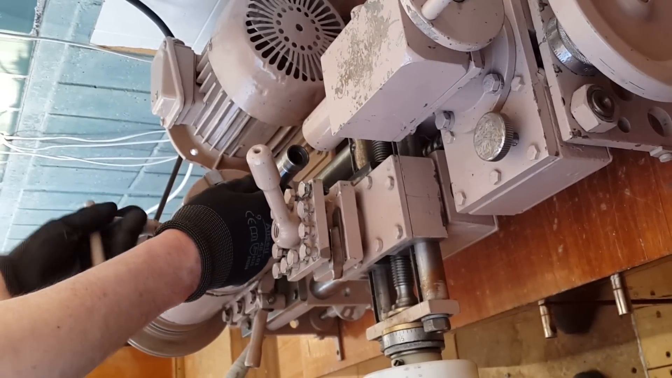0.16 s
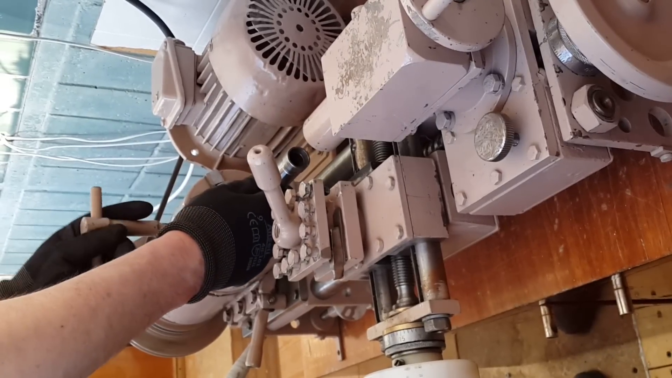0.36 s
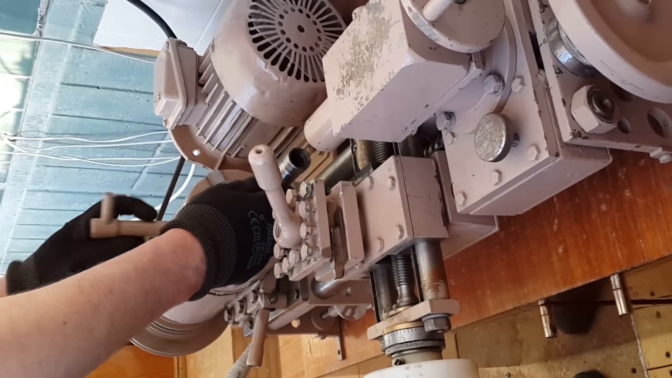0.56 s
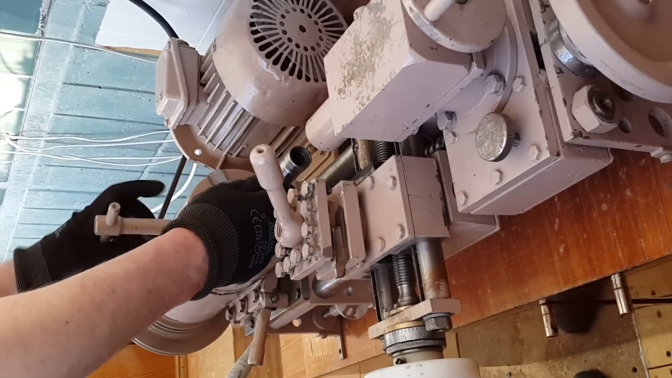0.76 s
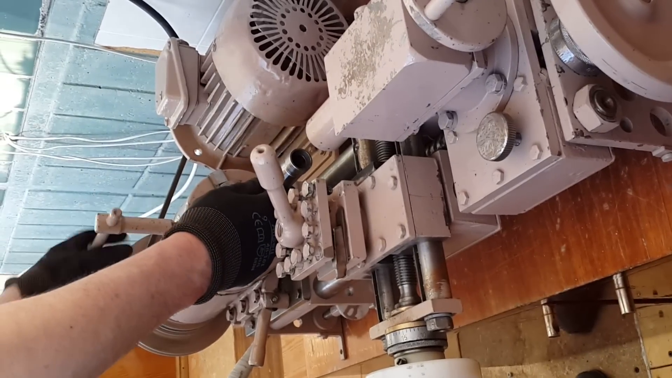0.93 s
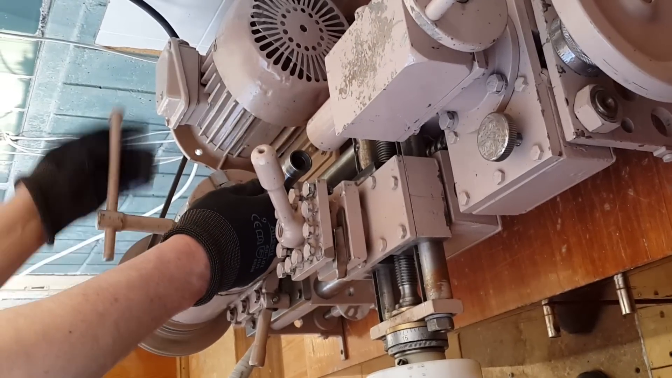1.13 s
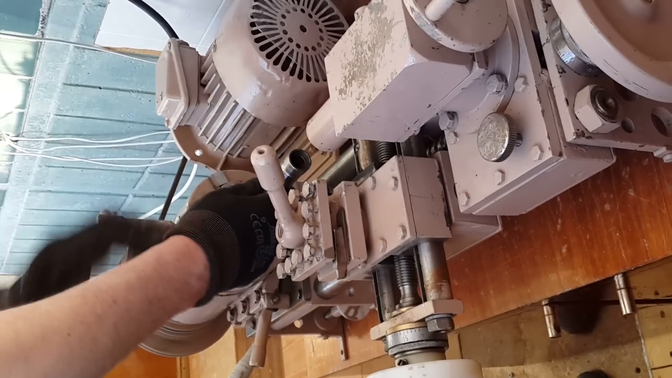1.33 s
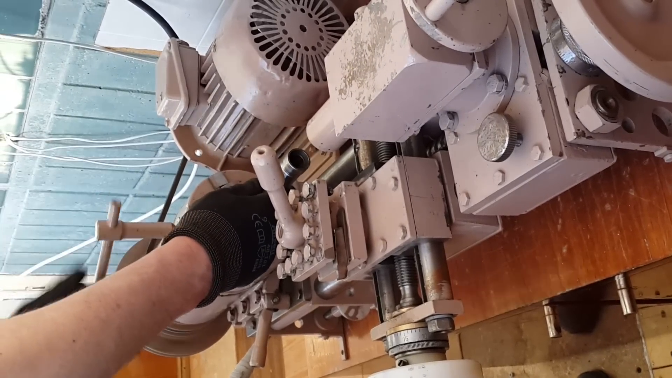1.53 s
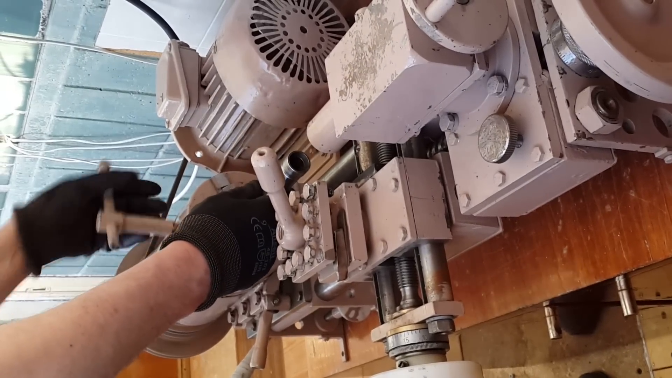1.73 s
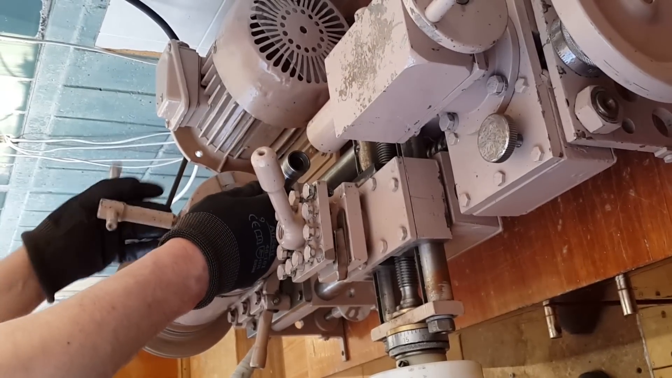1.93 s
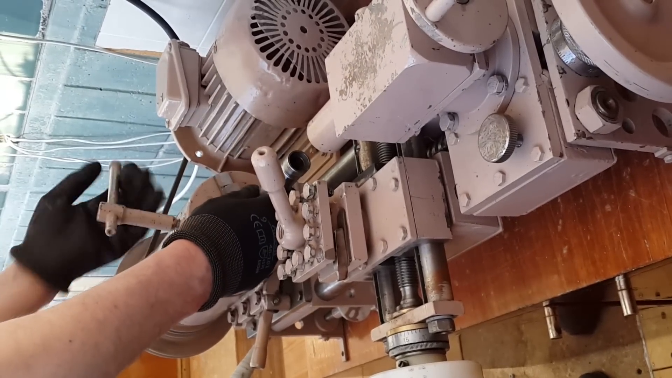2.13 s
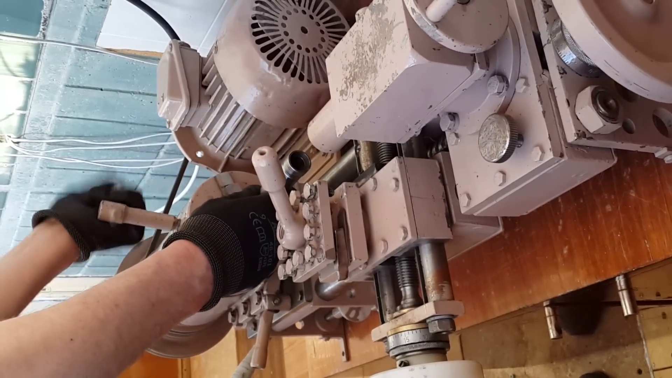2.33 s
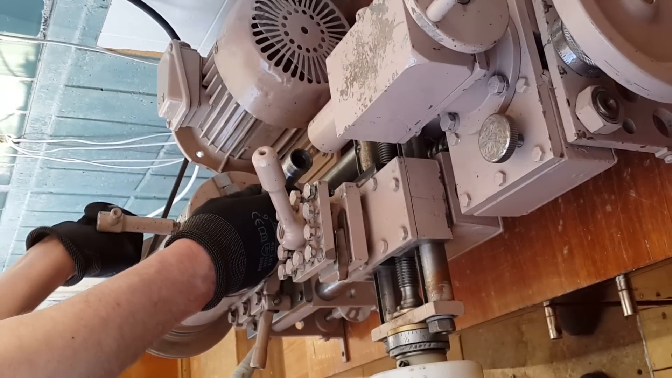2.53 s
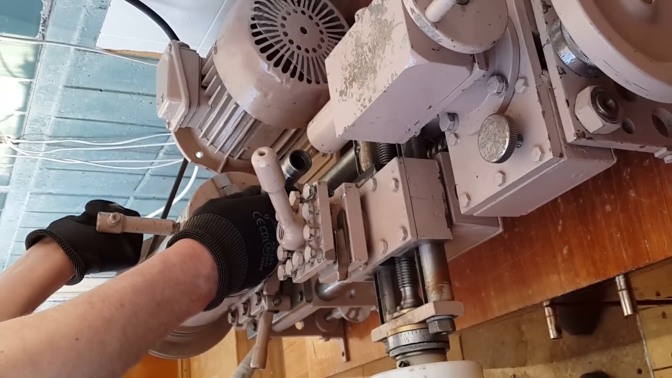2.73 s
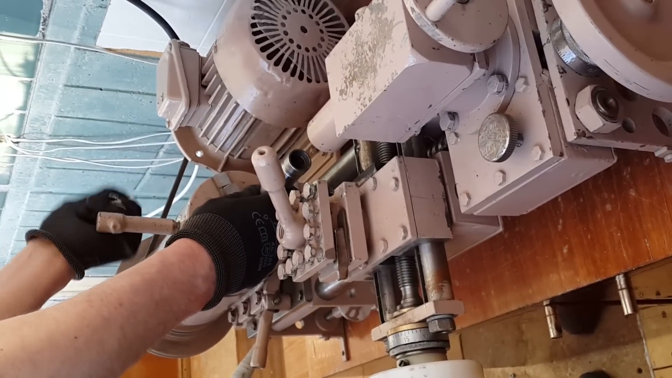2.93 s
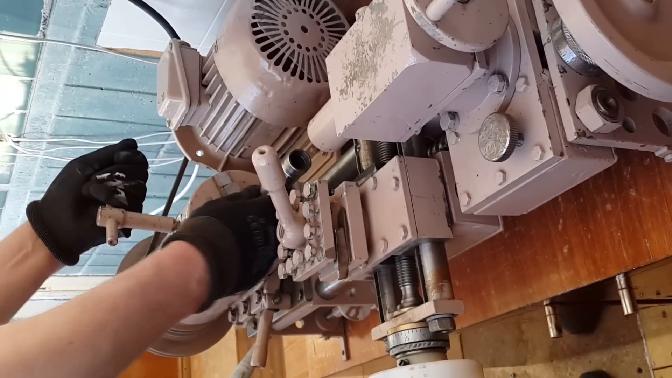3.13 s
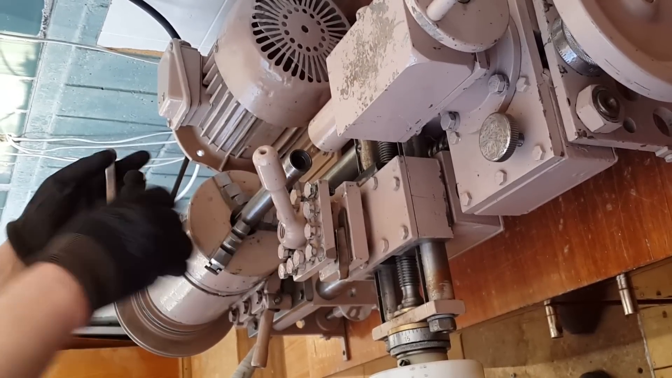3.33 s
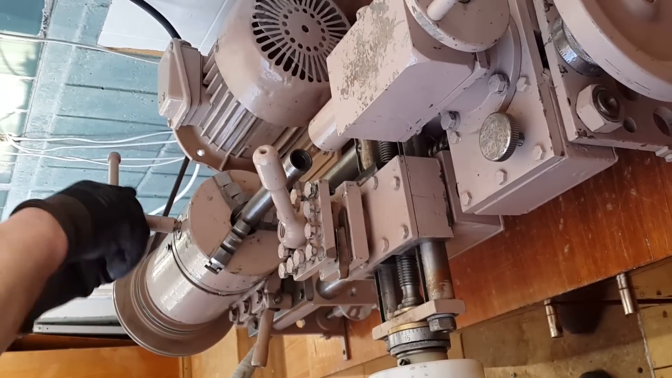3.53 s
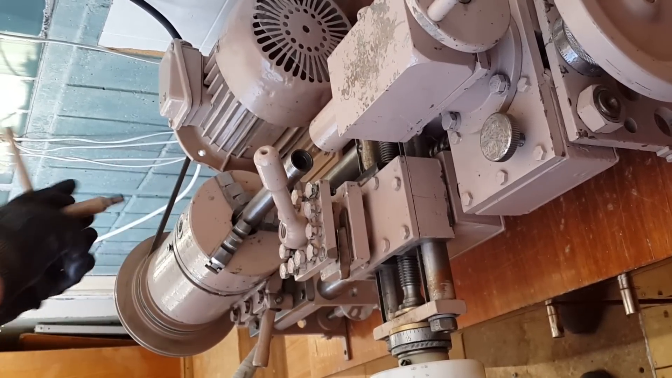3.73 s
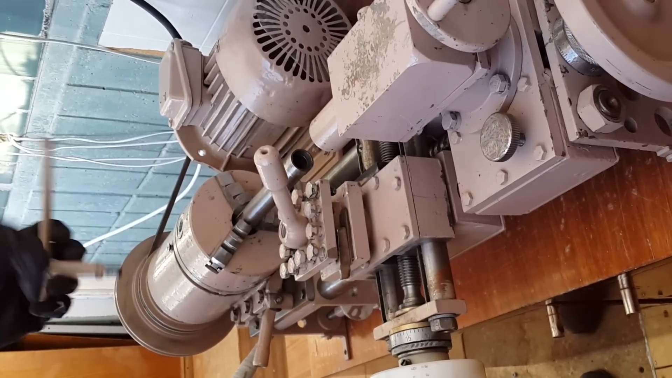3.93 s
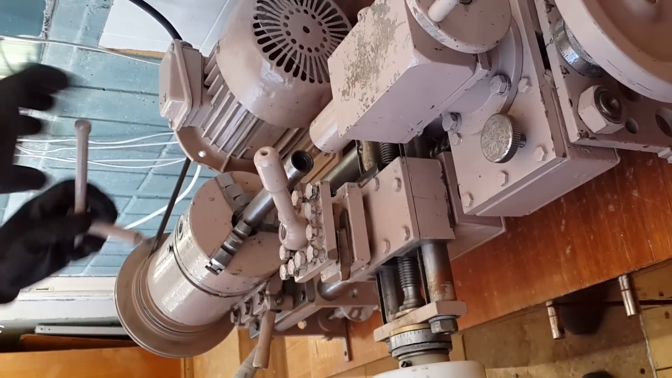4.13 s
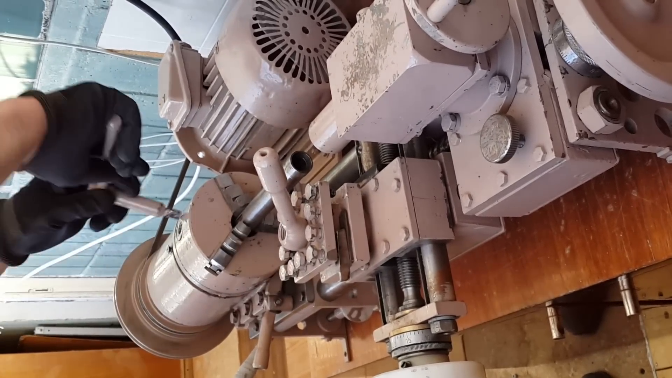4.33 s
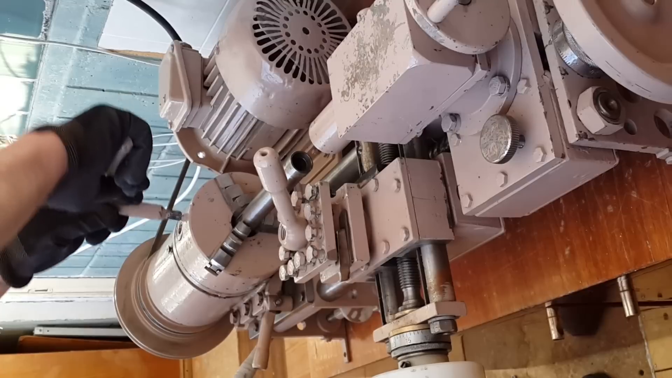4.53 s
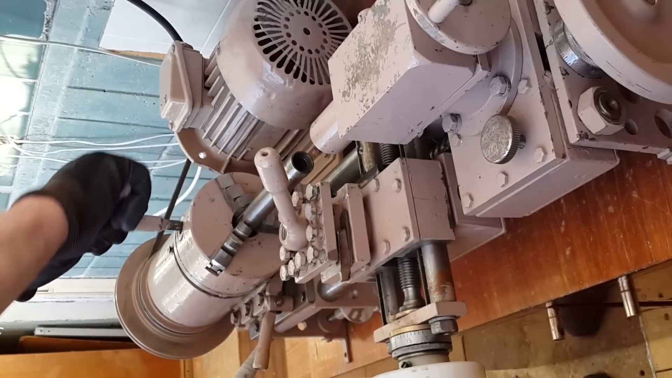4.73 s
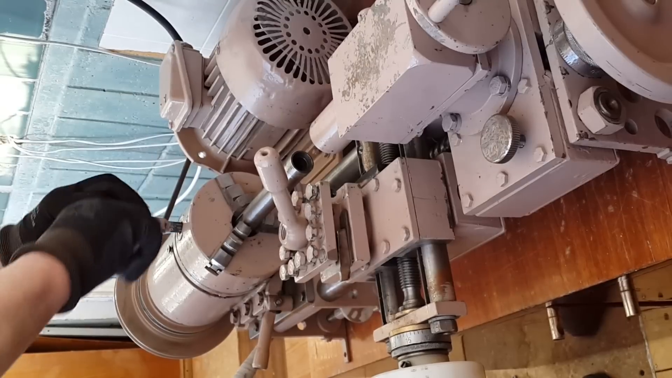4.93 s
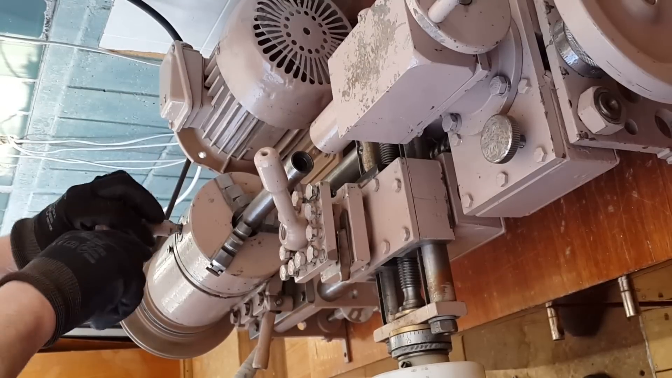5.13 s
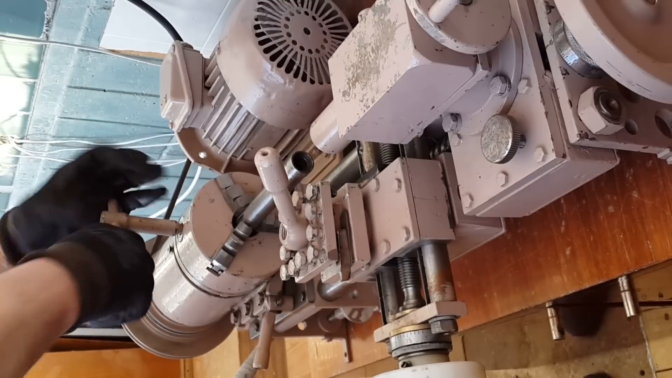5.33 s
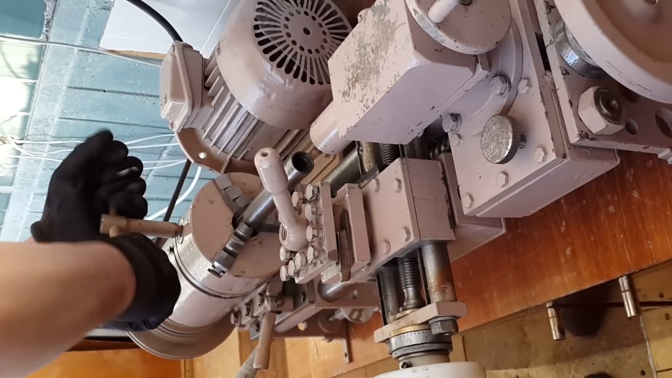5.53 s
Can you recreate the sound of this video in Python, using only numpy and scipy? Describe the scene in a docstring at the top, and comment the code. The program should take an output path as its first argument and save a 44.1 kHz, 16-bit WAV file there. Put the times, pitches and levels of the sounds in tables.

```python
"""Tightening a lathe chuck

A small workshop, a stereo pair close to the lathe. Over quiet room air, gloves rustle and a T-handled
key closes the jaws on a steel bar. The scroll rasps in tiny slips as it is spun, and the key's loose
handle jingles. Up front, key, jaws and bar knock and set the heavy machine ringing; at the next socket
the key clacks home and squeaks under load."""
import sys
import numpy as np
from scipy import signal
from scipy.fft import irfft, next_fast_len
from scipy.io import wavfile
from scipy.ndimage import uniform_filter1d

SR = 44100
rng = np.random.default_rng(int(sys.argv[2]) if len(sys.argv) > 2 else 0)


def unload_audio(sound):
    """Save the sound as a 16-bit wav file, at the path given as the first command line argument."""
    columns = np.transpose(np.atleast_2d(sound))
    # keep every value between -1 and 1, then stretch to whole-number steps
    steps = np.round(np.clip(columns, -1, 1) * 32767)
    wavfile.write(sys.argv[1], SR, steps.astype(np.int16))


N = 250047
RING_SIZE, NOISE_SIZE = 16384, 2 * next_fast_len(N // 2 + 1)   # samples
TIME = np.arange(N) / SR
AGE = TIME[:RING_SIZE]   # time since a contact
CUTOFF_HZ = 14700
SWELL_DB = 12   # a swell climbs this far in its rise time and sinks as far in its fall time

# How alike the two microphones hear the room: f/Hz, correlation
MIC_LIKENESS = [(60, .99), (130, .97), (290, 0.88), (640, 0.45), (1400, .05), (3100, -0.11), (6800, 0),
                (15000, 0)]
# Where each pitch sits across the pair: f/Hz, left minus right/dB
MIC_BALANCE = [(60, 1.5), (300, -3), (700, -0.5), (1200, -2.5), (1800, -3.5), (2800, -1), (4200, 1.5),
               (6400, 5), (7600, 5), (9000, -8.5), (12000, -0.5), (15000, 0.5)]
# Room tone of the workshop: f/Hz, relative level/dB
AIR_SPECTRUM = [(15, -22), (25, 14), (54, -9), (196, 0), (1350, -12), (1460, -14), (1760, -15),
                (2130, -13.5), (6040, -34), (6900, -20.5), (15000, -13.5)]
# Rubbing cloth: f/Hz, relative level/dB
CLOTH_SPECTRUM = [(100, -18), (190, 1.5), (320, 0), (500, -10), (850, -3.5), (1500, -5), (2600, -4.5),
                  (4200, -5), (6000, -6), (9000, -4.5), (11000, -11), (15000, -15)]
# A glove or sleeve brushes past: t/s at its height, rise/s, fall/s, relative level/dB
RUSTLES = [(0.02, 0.1, 0.32, -60.5), (0.85, 0.66, 0.14, -59), (1.95, 0.25, 0.41, -55),
           (2.3, 0.13, 0.38, -61), (2.6, 0.3, 1, -66), (3.27, 0.22, 0.23, -58.5), (3.39, 0.1, 0.07, -59),
           (3.64, 0.068, 0.35, -60.5), (3.83, 0.15, 0.11, -52.5), (4.03, 0.14, 0.044, -46),
           (4.09, 0.1, 0.12, -59.5), (4.307, 0.01, 0.082, -62.5), (4.6, 0.1, 0.4, -69.5),
           (5.1, 0.25, 0.55, -65), (5.43, 0.74, 0.29, -57), (5.61, 0.035, 0.25, -50.5)]

# The machine's four registers (thud, clank, clack, click): low f/Hz, high f/Hz
REGISTERS = [(65, 400), (400, 1400), (1400, 4500), (4500, 15000)]
# How each register dies away: build-up/s, crack over tail/dB, crack t60/s, tail t60/s
REGISTER_DECAYS = [(0.0056, -18, 0.022, 0.29), (0.00094, -3, 0.019, 0.24), (0.00071, -3, 0.042, 0.24),
                   (0.00025, 0, 0.051, 0.23)]
# Broad colour of the machine: f/Hz, relative level/dB
MACHINE_SPECTRUM = [(50, -54), (75, -9), (120, -5.5), (170, -1), (260, -2.5), (380, -5.5), (520, -3),
                    (720, -17), (1000, -14.5), (1450, -13.5), (2500, -12), (8800, -26), (11000, -29),
                    (14500, -48.5)]
# Modes of bed, chuck and key: f/Hz, width/Hz, level/dB over the broad colour struck, level/dB rubbed
RESONANCES = [(91.4, 13, 0.5, -10), (131.3, 4.1, 7.5, 3.5), (156.7, 5.1, 11.5, 5), (200.5, 7.2, 5.5, 7.5),
              (245.3, 5.2, 1.5, -1), (278.9, 5.8, 2.5, -4.5), (482.6, 20.6, -4, 0), (631, 7.5, 11, -20),
              (860, 36, 16.5, 10), (922, 16, 14, 13.5), (1002, 21, 9.5, 11.5), (1070, 100, 3, 7),
              (1290.5, 8.1, 16.5, 6), (1630, 19, 11, 11.5), (1778, 32, 8.5, 11.5), (2225, 18, 7, 7),
              (2735, 7.4, -14, 13.5), (2914, 33, -2.5, 7.5), (3284, 66, 5.5, -15), (4120, 45, 10, -16),
              (4124, 43, 3.5, 7), (4340, 20, 14.5, 10), (5180, 510, 7.5, 4), (5720, 39, 13.5, -18),
              (6875, 790, 9.5, 7), (8450, 130, 9, 9), (9100, 22, -1, 9), (9100, 74, 2.5, 12.5)]
STRUCK, RUBBED = 2, 3   # its level columns
MODE_WAVES = np.exp(2j * np.pi * np.array(RESONANCES)[:, :1] * AGE)
SOFT_KNEE_HZ, TREBLE_HZ = 1200, 8100   # soft contacts roll off above the knee; losses apply at TREBLE_HZ

# Vigour of the spinning scroll as the jaws run in: t/s, level/dB
SPIN_VIGOUR = [(1.05, -62), (1.17, -43.5), (1.224, -41), (1.322, -40.5), (1.358, -40.5), (1.502, -38),
               (1.588, -35), (1.644, -44.5), (1.728, -47), (1.73, -44.5), (1.814, -41), (1.892, -59.5),
               (1.95, -93)]
SPIN_USUAL_DB, SPIN_FADE_DB_PER_S = -39, 389   # the fade lies before and after the spin
# How each register follows the spin: relative level/dB at the usual vigour, dB per dB of vigour
SPIN_RESPONSE = [(-39.5, 0.78), (-40, 0.97), (-36, 1.07), (-39.5, 1.7)]
# Steel drags until it catches: t/s of the catch, rise/s, fall/s, relative level/dB, treble loss/dB
DRAGS = [(0.437, 0.22, 0.048, -50.5, 9), (0.604, 0.012, 0.021, -41.5, -9.5), (0.785, 0.12, 0.014, -52, -2),
         (2.356, 0.011, 0.048, -50.5, -1), (2.689, 0.079, 0.043, -45, 5.5), (2.806, 0.043, 0.055, -45, 21),
         (3.18, 0.037, 0.06, -53.5, 5), (3.306, 0.1, 0.3, -65, 17), (4.857, 0.011, 0.013, -50, -2),
         (4.9, 0.037, 0.015, -42, 7), (4.946, 0.004, 0.034, -37.5, -2), (5.14, 0.02, 0.012, -51.5, -11),
         (5.36, 0.01, 0.02, -55.5, 36), (5.43, 0.02, 0.013, -58.5, 18), (5.53, 0.073, 0.081, -51, -18.5)]
# Weight of a drag in each register: level/dB
DRAG_TILT_DB = [4.5, -4.5, -2.5, -9]

# The loose handle slides in the key: t/s, relative level/dB, top mode's loss to the grip/dB
JINGLES = [(0.17, -48.5, 0.5), (0.86, -58, 14), (2.141, -57.5, 60), (2.461, -41, 40), (2.546, -47.5, 22),
           (2.575, -47.5, 55), (2.634, -55, 10), (2.676, -45.5, 24), (2.771, -59, 17), (2.825, -52.5, 7),
           (3.342, -56.5, 50), (4.714, -55.5, 26)]
HANDLE_HZ, HANDLE_WIDTH_HZ = [1840, 4340, 8120, 12500], [80, 99, 70, 120]   # bending modes
HANDLE_DB, GRIP_SLOPE = [-4, -0.5, -1.5, 0], 5.2   # the grip's loss grows as this power of pitch

# Harsh partials of the key binding in its socket: f/Hz, relative level/dB
CHATTER_PARTIALS = [(2094, -56), (2218, -59), (2546, -46.5), (3149, -53), (3784, -53), (4113, -56),
                    (5076, -55), (5265, -67), (5362, -65), (5975, -60), (6638, -55)]
# The squeak's three swells: t/s at the height, rise/s, fall/s, relative level/dB
SQUEAL = (5.463, 0.02, 0.05, -54)
CHATTER = (5.524, 0.03, 0.045, -32)
SHANK_HUM = (5.548, 0.05, 0.06, -41)
SQUEAL_HARMONICS_DB, SQUEAL_HOLD_DB, SHANK_HZ = [7.5, -1, 2, -2], -68, 444
BIND_S, SLACK_HZ, LOADED_HZ, LOAD_TIME_S = 5.447, 1474, 1700, 0.022   # the slip rate climbs with load

# Steel on steel: t/s, relative level/dB, treble loss/dB, extra thud of the bed/dB, favoured f/Hz
KNOCKS = [(0.028, -42.5, 7.5, -0.5, 880), (0.1135, -35, 14.5, -8.5, 3240), (0.307, -48, 12, -20, 991),
          (0.404, -40.5, 68, -13, 1030), (0.426, -47.5, 12, -11, 930), (0.478, -46.5, 27, 2, 1090),
          (0.602, -33, 1.5, 1.5, 8900), (0.623, -34.5, 7, 8.5, 1630), (0.702, -27.5, 13, 0.5, 1010),
          (0.859, -50, 18, 1.5, 1740), (1.005, -65.5, 0, 10, 4430), (1.358, -40.5, -3, 6.5, 4870),
          (1.399, -35, 22, -2.5, 1760), (1.458, -28, 19, -10, 1480), (1.812, -39.5, 2, 8, 1730),
          (1.844, -52, 16, 17, 1090), (2.005, -47.5, 14, 1, 1860), (2.035, -52.5, 20, 14.5, 960),
          (2.054, -43, 9, 9.5, 4540), (2.218, -53, 20, 9, 1280), (2.382, -37, -2, 8.5, 2020),
          (2.437, -32, -1.5, -11, 2000), (2.451, -32, 11, -0.5, 1100), (2.48, -40.5, 1, 11.5, 1300),
          (2.572, -39, 11.5, -14, 1870), (2.647, -49, 29, 6.5, 980), (2.675, -38.5, 22, -10, 1810),
          (3.02, -46.5, 13, -10.5, 1580), (3.079, -41, 11.5, -1, 1590), (3.1, -37, 12.5, 5, 1770),
          (3.543, -54.5, 44, 7, 920), (3.629, -58.5, 29, 11.5, 1000), (3.677, -46, 3.5, 3, 7700),
          (3.725, -44, 10, 0, 3990), (4.453, -32.5, 7.5, 0, 4340), (4.665, -48.5, 14, 9.5, 990),
          (4.688, -43.5, 5.5, 5.5, 1220), (4.84, -50, 31, -10, 940), (4.861, -35, 4, -1.5, 915),
          (4.884, -32.5, 3, -13, 1070), (4.966, -21.5, 4.5, -3.5, 8400), (5.143, -37.5, 4, 0.5, 1630),
          (5.183, -35, 18, 8, 1070), (5.369, -32.5, 27.5, -5, 886), (5.479, -40, 0, -2, 3360)]
# Part of a knock that rings as clean modes, in each register: share of power
CLEAN_SHARE = [0.52, 0.3, 0.018, 0.058]
USUAL_LOSS_DB = 17.5   # treble loss of the contact that gives the machine its broad colour
FIRM_DB, SNAP_PER_DB, SNAP_RANGE_DB = -43, 0.4, (-5, 1)   # harder blows snap, lighter touches swell


def from_db(db):
    """Decibels to gain."""
    return np.exp(np.asarray(db) * (np.log(10) / 20))


def rms_one(x):
    """Scale to rms 1."""
    return x / np.sqrt(np.mean(x ** 2) + 1e-20)


def at_hz(points, hz):
    """Read a table on a log-frequency axis."""
    points = np.array(points)
    return np.interp(np.log(hz), np.log(points[:, 0]), points[:, 1])


def add(out, s, sound):
    """Mix a sound in at time s."""
    start = max(0, round(s * SR))
    out[:, start:start + sound.shape[1]] += sound[:, :max(0, N - start)]


def bins(size):
    """Frequencies of a spectrum of that many samples."""
    return np.maximum(np.arange(size // 2 + 1) * SR / size, 1)


def peak(hz, centre_hz, width_hz):
    """Magnitude of one resonance, 1 on top."""
    return 1 / np.hypot(1, 2 * (hz - centre_hz) / width_hz)


def swell(s, rise_s, fall_s, db):
    """Gain that climbs to its height at s and sinks again, evenly in dB."""
    away = np.maximum((s - TIME) / max(rise_s, 1 / SR), (TIME - s) / max(fall_s, 1 / SR))
    return from_db(np.maximum(db - SWELL_DB * away, -200))


def mic_pair(hz):
    """Complex gains, left and right: each pitch reaches the two microphones apart in level and phase."""
    sides = np.array([[1], [-1]])
    apart = np.arccos(np.clip(at_hz(MIC_LIKENESS, hz), -1, 1)) / 2 * rng.choice([-1, 1], len(hz))
    return from_db(sides * at_hz(MIC_BALANCE, hz) / 2) * np.exp(1j * sides * apart)


def diffuse(colour):
    """Noise of a given magnitude spectrum as the pair hears it; rms 1."""
    hz = bins(2 * len(colour) - 2)
    phases = np.exp(2j * np.pi * rng.random(len(hz)))
    return rms_one(irfft(colour * phases * mic_pair(hz)))


def steady(spectrum):
    """Diffuse noise for the whole scene."""
    return diffuse(from_db(at_hz(spectrum, bins(NOISE_SIZE))))[:, :N]


def room_air(level_db):
    """The workshop's steady rumble and hiss, far behind the lathe."""
    return from_db(level_db) * steady(AIR_SPECTRUM)


def gloves(gain_db, grain_db):
    """Cloth rubs with a fine, uneven grain, in one swell for each move of the hands."""
    grain = rms_one(uniform_filter1d(rng.standard_normal(N), size=200))
    rubbing = np.sqrt(sum(swell(*row) ** 2 for row in RUSTLES))
    return rubbing * from_db(gain_db + grain_db * grain) * steady(CLOTH_SPECTRUM)


def softness(hz):
    """How much of a contact's treble loss is felt at a pitch: 0 in the bass, 1 at TREBLE_HZ."""
    return np.log1p((hz / SOFT_KNEE_HZ) ** 4) / np.log1p((TREBLE_HZ / SOFT_KNEE_HZ) ** 4)


def register_colours(column):
    """The machine's resonances on its broad colour, cut into the four registers."""
    hz = bins(RING_SIZE)
    power = 1 + sum((from_db(row[column]) * peak(hz, row[0], row[1])) ** 2 for row in RESONANCES)
    colour = from_db(at_hz(MACHINE_SPECTRUM, hz)) * np.sqrt(power)
    return [colour / np.sqrt((1 + (low / hz) ** 12) * (1 + (hz / high) ** 12))
            for low, high in REGISTERS]


def clean_modes(colour, spread_db):
    """A blow starts every resonance at once, each with a strength of its own; rms 1."""
    hz, width_hz = np.array(RESONANCES)[:, :2].T
    scatter = from_db(spread_db * rng.standard_normal(len(hz)))
    strength = np.interp(hz, bins(RING_SIZE), colour) * np.sqrt(width_hz) * scatter
    at_mics = mic_pair(hz) * strength * rng.choice([-1, 1], len(hz))
    return rms_one(np.imag(at_mics @ MODE_WAVES))


def contact(colour, build_s, first_db, first_t60, second_t60, clean_share=0):
    """Steel and room ring after one contact, in two summed decays; rms near 1 over the first 25 ms."""
    decay = from_db(first_db - 60 * AGE / first_t60) + from_db(-60 * AGE / second_t60)
    envelope = decay * (1 - np.exp(-AGE / build_s))
    ring = diffuse(colour)
    if clean_share > 0:
        modes = clean_modes(colour, spread_db=1.0)
        ring = np.sqrt(1 - clean_share) * ring + np.sqrt(clean_share) * modes
    return rms_one(ring * envelope) * np.sqrt(np.mean(envelope ** 2) / np.mean(envelope[:SR // 40] ** 2))


def scraping(slips_per_s, spread_db, trims_db, hiss_db, points):
    """Spun or dragged steel slips at random, at a few points that each ring the machine their own way."""
    sizes = from_db(spread_db * np.minimum(rng.exponential(1, N), 4)) * rng.choice([-1, 1], N)
    slips = sizes * (rng.random(N) < slips_per_s / SR)
    slip_point = rng.integers(0, points, N)
    idle_s = np.abs(TIME - np.clip(TIME, SPIN_VIGOUR[0][0], SPIN_VIGOUR[-1][0])).clip(0, 1)
    vigour_db = np.interp(TIME, *np.transpose(SPIN_VIGOUR)) - SPIN_USUAL_DB - SPIN_FADE_DB_PER_S * idle_s
    drags = [(swell(*shape), loss_db) for *shape, loss_db in DRAGS]
    # a bright, high hiss on the scraping steel
    hiss_lift = from_db(hiss_db * (bins(RING_SIZE) / CUTOFF_HZ).clip(0, 1) ** 2)
    out = np.zeros((2, N))
    for k, colour in enumerate(register_colours(RUBBED)):
        spin_db, follows = SPIN_RESPONSE[k]
        soft = softness(np.sqrt(np.prod(REGISTERS[k])))
        drag = sum(gain * from_db(DRAG_TILT_DB[k] - loss_db * soft) for gain, loss_db in drags)
        force = from_db(spin_db + follows * vigour_db) + drag
        rasp = 0
        for point in range(points):
            ring = contact(colour * hiss_lift, *REGISTER_DECAYS[k])
            rasp += signal.oaconvolve((slips * (slip_point == point))[None], ring)[:, :N]
        out += from_db(trims_db[k]) * force * rms_one(rasp)
    return out


def handle_jingles(build_s, gain_db, detune_widths):
    """The handle rod rings in its bending modes as it slides; the grip damps, blurs and shifts them."""
    out, hz = np.zeros((2, N)), bins(RING_SIZE)
    for s, level_db, grip_db in JINGLES:
        for mode_hz, width_hz, mode_db in zip(HANDLE_HZ, HANDLE_WIDTH_HZ, HANDLE_DB):
            shifted_hz = mode_hz + detune_widths * width_hz * rng.standard_normal()
            colour = peak(hz, shifted_hz, 2 * width_hz) ** 2
            # a long ring over a short, faint one
            ring = contact(colour, build_s, first_db=13, first_t60=0.23, second_t60=0.08)
            damped_db = grip_db * (mode_hz / HANDLE_HZ[-1]) ** GRIP_SLOPE
            add(out, s, from_db(level_db + gain_db + mode_db - damped_db) * ring)
    return out


def key_squeak(width_hz, jitter):
    """Stick and slip squeals upward as the load grows, then chatters harshly while the shank hums."""
    slackness = np.exp(-np.maximum(TIME - BIND_S, 0) / LOAD_TIME_S)
    slip_hz = LOADED_HZ + (SLACK_HZ - LOADED_HZ) * slackness
    waver = rms_one(uniform_filter1d(rng.standard_normal((2, N)), size=80))
    phase = 2 * np.pi * np.cumsum(slip_hz * (1 + jitter * waver), axis=1) / SR
    squeal = np.sqrt(2) * sum(from_db(db) * np.sin(k * phase)
                              for k, db in enumerate(SQUEAL_HARMONICS_DB, 1))
    hz = bins(NOISE_SIZE)
    cluster = sum(from_db(db) * peak(hz, centre_hz, width_hz) ** 2 for centre_hz, db in CHATTER_PARTIALS)
    chatter = diffuse(cluster)[:, :N]
    hum = np.sin(2 * np.pi * SHANK_HZ * TIME)
    held = from_db(SQUEAL_HOLD_DB) * (TIME > SQUEAL[0])   # under full load the squeal holds on faintly
    return np.maximum(swell(*SQUEAL), held) * squeal + swell(*CHATTER) * chatter + swell(*SHANK_HUM) * hum


def knocks(trims_db, lead_s, focus_db, focus_width, focus_lift_db):
    """Key, jaws and bar strike the machine; hard blows reach far into the treble, soft ones roll off."""
    out, hz = np.zeros((2, N)), bins(RING_SIZE)
    colours = register_colours(STRUCK)
    centres_hz = np.sqrt(np.prod(REGISTERS, axis=1))
    for s, level_db, loss_db, thud_db, focus_hz in KNOCKS:
        levels_db = level_db - loss_db * softness(centres_hz) + trims_db
        levels_db[0] += thud_db
        hardness = from_db((USUAL_LOSS_DB - loss_db) * softness(hz))
        # the spot that is struck favours the resonances around one pitch
        spot = from_db(focus_db * peak(hz, focus_hz, focus_width * focus_hz) ** 2)
        levels_db += focus_lift_db * np.array([low <= focus_hz < high for low, high in REGISTERS])
        snap_db = np.clip(SNAP_PER_DB * (level_db - FIRM_DB), *SNAP_RANGE_DB)
        for k, (build_s, crack_db, crack_t60, tail_t60) in enumerate(REGISTER_DECAYS):
            ring = contact(colours[k] * hardness * spot, build_s / from_db(snap_db),
                           crack_db + snap_db, crack_t60, tail_t60, CLEAN_SHARE[k])
            add(out, s - lead_s, from_db(levels_db[k]) * ring)
    return out


def scene():
    """At the chuck: metalwork and gloves up close, the workshop's air behind."""
    steel = knocks(trims_db=[-3.5, -7.0, -3.5, -2.5], lead_s=0.0002,
                   focus_db=9.0, focus_width=0.31, focus_lift_db=3.5)
    steel += scraping(slips_per_s=900, spread_db=4.5, trims_db=[0, 0, 1, 1], hiss_db=10, points=4)
    steel += handle_jingles(build_s=0.0046, gain_db=-4, detune_widths=0.08)
    steel += key_squeak(width_hz=220, jitter=0.0082)
    return steel + gloves(gain_db=2.0, grain_db=1.5) + room_air(level_db=-67)


def record(dry):
    """The microphones lose the deepest bass, and the top is cut steeply."""
    low_cut = signal.butter(2, 58, "high", fs=SR, output="sos")
    high_cut = signal.ellip(10, 0.1, 80, CUTOFF_HZ, fs=SR, output="sos")
    return signal.sosfilt(high_cut, signal.sosfilt(low_cut, dry))


dry = scene()
out = record(dry)
unload_audio(out)
```